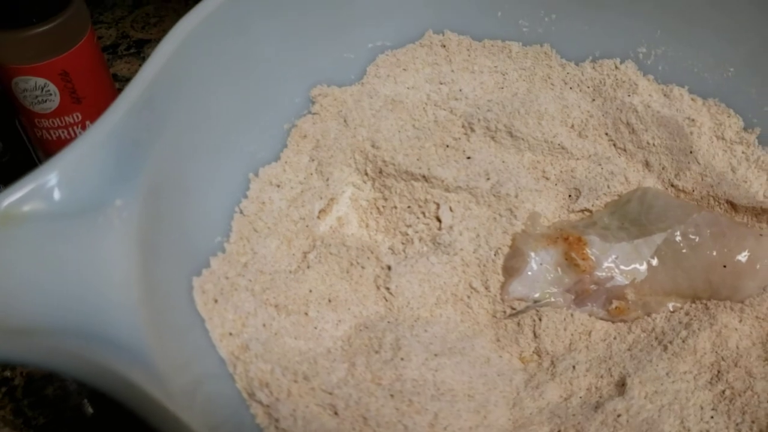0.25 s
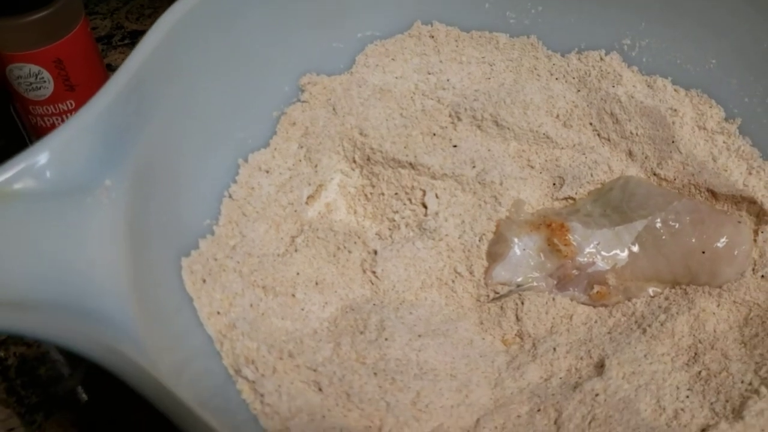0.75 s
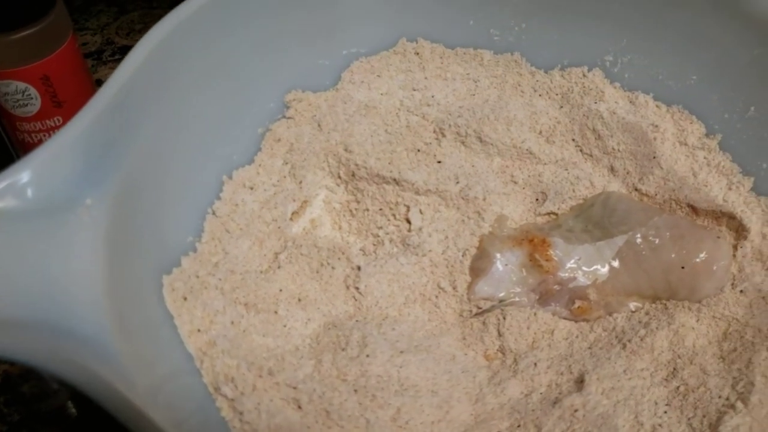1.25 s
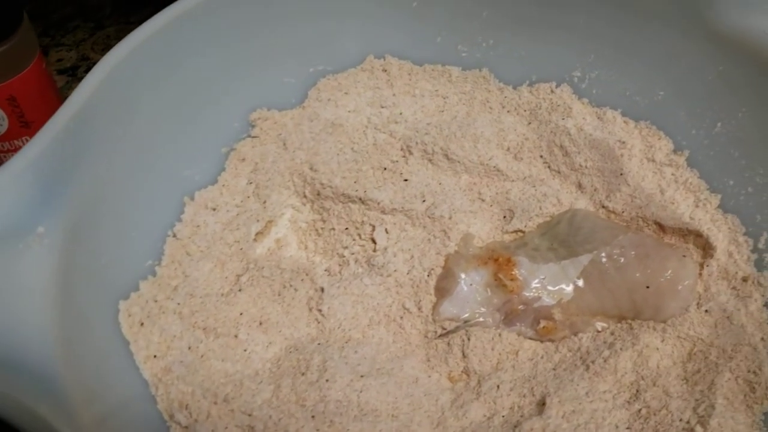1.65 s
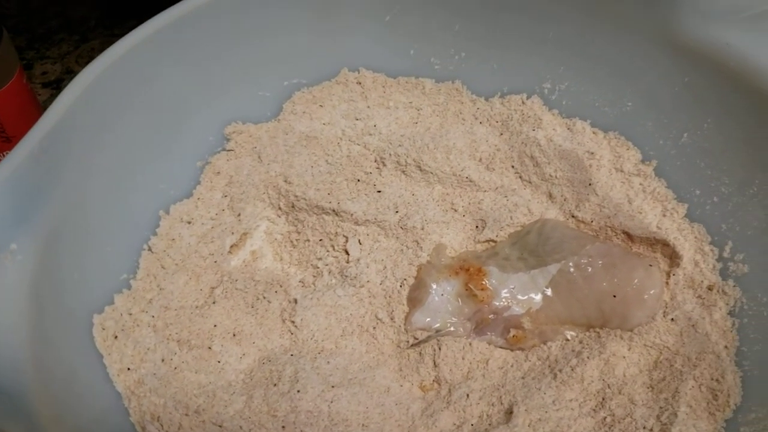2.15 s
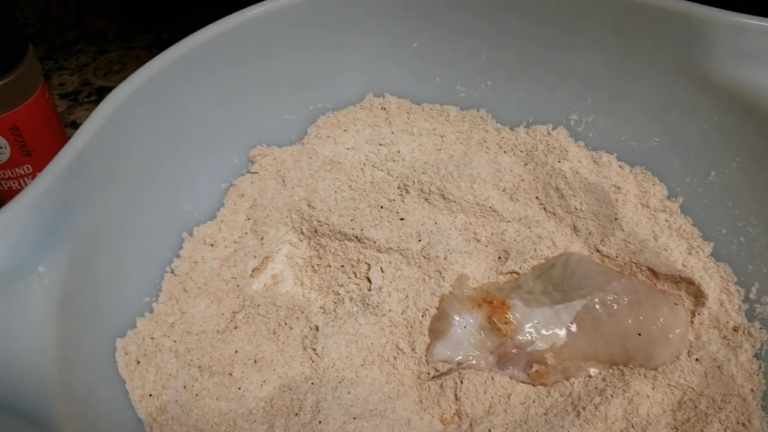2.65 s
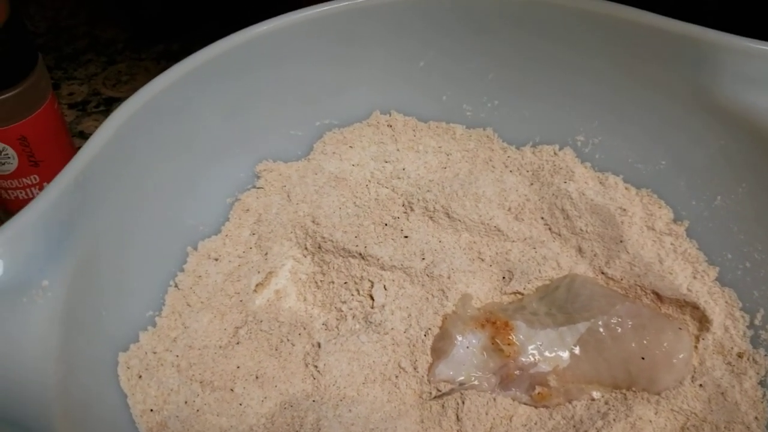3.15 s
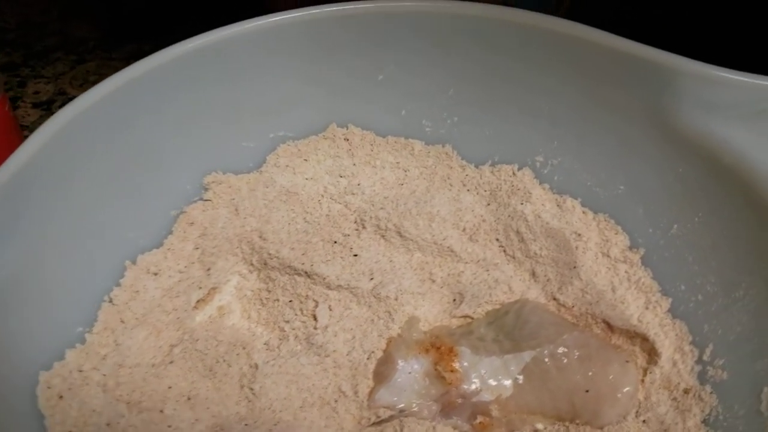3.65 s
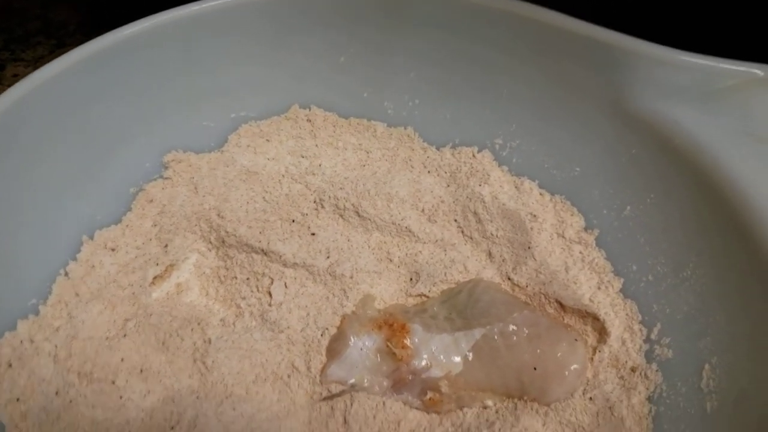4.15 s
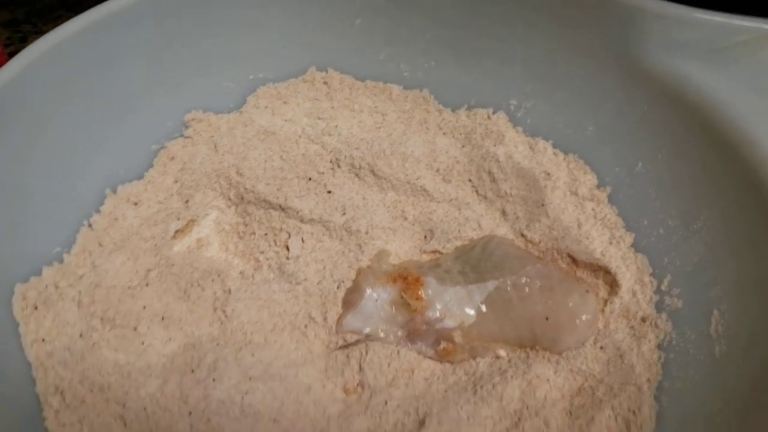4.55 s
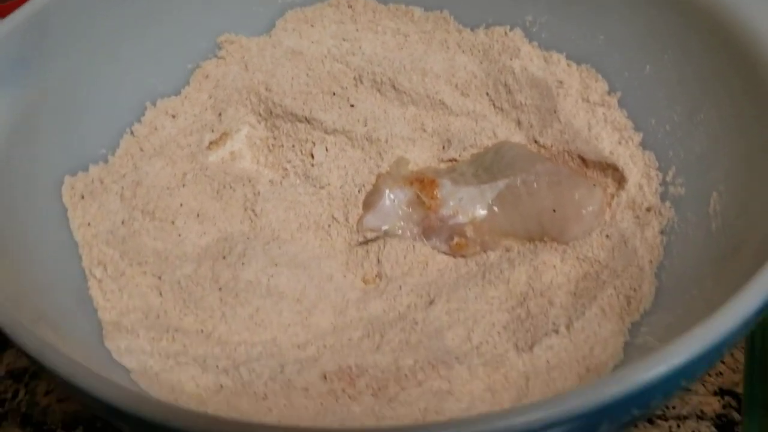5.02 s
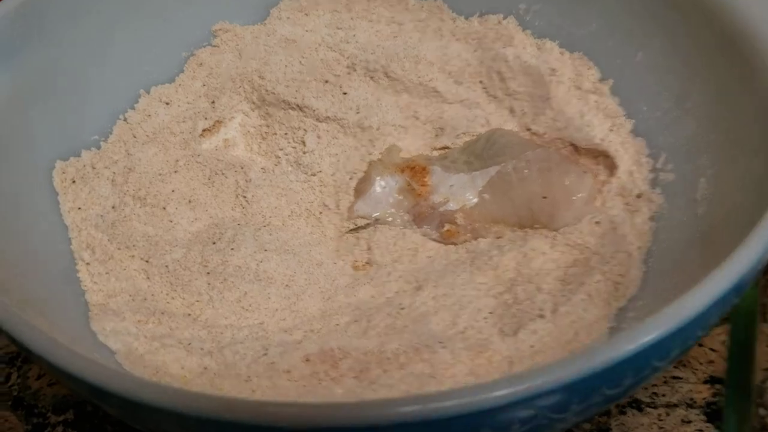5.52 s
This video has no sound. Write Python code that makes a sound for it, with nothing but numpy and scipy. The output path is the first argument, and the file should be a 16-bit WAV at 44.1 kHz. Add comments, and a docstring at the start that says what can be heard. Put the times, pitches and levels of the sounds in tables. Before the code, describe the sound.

A quiet home kitchen, heard close through a small stereo camera microphone. A low, steady refrigerator hum with soft rumble and faint hiss, stronger on the left, runs throughout, easing slightly after about 3 s. From 0.4 s metal tongs make a few tiny ticks. At 1.3 s and 1.6 s come clearer clacks against the bowl, then a scrape near 2 s and a bright, hard tap at 2.2 s. Between 2.8 and 3.5 s the contacts crowd together: ringing clacks, dry rattles, gritty sliding and low thumps as the bowl knocks the counter. From 3.6 to 4.3 s it is almost only the fridge. Faint taps resume, and from 4.7 to 5.15 s a second flurry arrives, with the loudest, sharpest click at 5.0 s, amid scraping. Brief scrapes trail off by 5.45 s; one light tick falls at 5.75 s. Rings are short, with small-room reflections.

```python
"""A refrigerator hums and hisses; then steel kitchen tongs click, tap and scrape at a bowl on a counter, close to
a two-port camera. Each contact is a short noise rattle plus one shared set of ringing modes, in four registers.
Scrapes are gritty noise, thumps are decaying counter modes, and a small kitchen answers with noise tails.
The refrigerator is sine lines over filtered noise. Above the bass, near sound reaches the right port first."""
import sys
import numpy as np
from scipy import signal
from scipy.fft import rfft, irfft, next_fast_len
from scipy.io import wavfile
from scipy.ndimage import uniform_filter1d, map_coordinates

SR = 44100
rng = np.random.default_rng(int(sys.argv[2]) if len(sys.argv) > 2 else 0)


def transcribe(u):
    """Save the signal u as a 16-bit wav file named by the first command-line argument.

    u: samples, shape (n,) or (channels, n), limited to [-1, 1]; the rate is SR.
    q: integer samples, one column per channel.
    """
    v = np.clip(np.atleast_2d(u).T, -1, 1)
    q = np.round(v * 32767).astype(np.int16)
    wavfile.write(sys.argv[1], SR, q)


N = 255118


def amp(db):
    """Decibels to gain."""
    return 10 ** (np.asarray(db) / 20)


def unit(x):
    """Scale to rms 1."""
    return x / np.sqrt(np.mean(x ** 2) + 1e-20)


def along(points, hz):
    """Interpolate (Hz, value) points on a log frequency axis."""
    f, v = np.transpose(points)
    return np.interp(np.log(hz + 1), np.log(f + 1), v)


def curve(rows):
    """One value per sample from (s, value) points."""
    return np.interp(np.arange(N) / SR, *np.transpose(rows))


def wobble(knots_hz):
    """Smooth random curve through normal knots."""
    knots = rng.standard_normal(int(N * knots_hz / SR) + 4)
    return map_coordinates(knots, [np.arange(N) * knots_hz / SR])


def filtered(x, response):
    """Apply a complex frequency response to x."""
    n = x.shape[-1]
    m = next_fast_len(n + 8192)
    return irfft(rfft(x, m) * response(np.fft.rfftfreq(m, 1 / SR)), m)[..., :n]


def patchy(depth_db):
    """Two noises sharing random gain patches in time and frequency."""
    z = signal.stft(rng.standard_normal((2, N)), nperseg=512)[2]
    field = rng.standard_normal(z.shape[1:])
    field = uniform_filter1d(field, size=8, axis=0)
    field = uniform_filter1d(field, size=12, axis=1)
    return signal.istft(z * amp(depth_db * unit(field)), nperseg=512)[1][:, :N]


# Diffuse sound at the two ports. Each row: frequency in Hz, left-right likeness (1 = identical).
PORT_LIKENESS = [(60, 0.98), (130, 0.87), (290, 0.63), (640, 0.65), (1400, 0)]


def paired(pair, spectrum):
    """Mix and colour two noises: bass alike at both ports, treble unrelated."""
    turn = lambda hz: np.arccos(np.clip(along(PORT_LIKENESS, hz), -1, 1)) / 2
    split = lambda hz: amp(along(spectrum, hz)) * [np.cos(turn(hz)), np.sin(turn(hz))]
    mid, side = filtered(pair, split)
    return np.array([mid + side, mid - side])


# Motor lines. Each row: frequency in Hz, level in dB rms before wobble and level changes.
HUM_LINES = [(59.2, -53.5), (96.9, -81.5), (150.7, -69.5), (199.2, -75.5), (236.9, -67.5), (312.2, -78),
             (414.5, -80)]
# Refrigerator level: hum and rumble rise slightly, then drop by 3.6 s. Each row: time in s, gain in dB.
FRIDGE_LEVEL = [(0, 2), (2.8, 3), (3.6, -0.5), (5.78, -0.5)]
# Rumble colour. Each row: frequency in Hz, relative spectral level in dB.
RUMBLE_COLOUR = [(20, -42), (35, -21.5), (52, -7), (75, -9.5), (100, -14), (122, -10.5), (170, -18),
                 (240, -15), (290, -22), (420, -21.5), (545, -32.5), (700, -43.5), (900, -56)]
# Hiss colour. Each row: frequency in Hz, relative spectral level in dB.
HISS_COLOUR = [(400, -40.5), (600, -3), (750, -5), (1000, 1.5), (1270, 5), (1700, 5), (2500, 5),
               (3000, -9.5), (3800, 0.5), (5000, -4.5), (6800, -9.5), (8000, -28.5), (10000, -29),
               (13000, -30.5), (16000, -38.5)]
# Hiss balance. Each row: frequency in Hz, left over right in dB.
HISS_LEFT_OVER_RIGHT = [(600, 4), (1000, 3), (1350, 10), (1700, 24.5), (3000, 19.5), (5000, 19),
                        (7500, 16.5), (10000, 1), (15000, 0)]
RUMBLE_RMS_DB, HISS_RMS_DB = -61.5, -66  # before level changes
HISS_FOLLOWS = .4  # dB of hiss per dB of refrigerator level


def fridge():
    """Slightly unsteady motor lines over rumble and a patchy hiss, stronger on the left."""
    t, level_db = np.arange(N) / SR, curve(FRIDGE_LEVEL)
    hum = 0
    for hz, rms_db in HUM_LINES:
        line_level = amp(rms_db + 3.0 + 0.4 * wobble(26))  # +3 dB: rms to peak
        hum = hum + line_level * np.sin(2 * np.pi * hz * t + .5 * wobble(5.3))
    rumble = unit(paired(patchy(depth_db=2.8), RUMBLE_COLOUR))
    lean = lambda hz: amp(along(HISS_LEFT_OVER_RIGHT, hz))
    shares = lambda hz: [lean(hz), hz ** 0] / np.sqrt(1 + lean(hz) ** 2)
    hiss = unit(filtered(patchy(depth_db=1.2), lambda hz: amp(along(HISS_COLOUR, hz)) * shares(hz)))
    low = amp(level_db) * (hum + amp(RUMBLE_RMS_DB) * rumble)
    return low + amp(HISS_RMS_DB + HISS_FOLLOWS * level_db) * hiss


# Faint top-octave hiss. Each row: time in s, level in dB rms.
FINE_HISS_LEVEL = [(0, -88), (1.0, -79), (3.6, -83.5), (5.78, -81)]


def fine_hiss():
    """Faint, slowly varying top-octave noise, unrelated at the two ports."""
    colour = [(8500, -29), (12500, 2), (15600, -2), (16100, -29)]  # Hz, dB
    noise = filtered(rng.standard_normal((2, N)), lambda hz: amp(along(colour, hz)))
    return amp(curve(FINE_HISS_LEVEL)) * unit(noise)


# Late decay of the room. Each row: frequency in Hz, t60 in s.
KITCHEN_T60 = [(200, 1), (1000, 0.4), (4000, 0.34), (12000, 0.11)]


def kitchen(x):
    """Bowl and counter scatter at once, walls and tiles answer longer; fresh noise tail each quarter second."""
    out, step = np.zeros((2, N + SR)), SR // 4
    delay = 30  # samples
    for start in range(0, N, step):
        hz, t, z = signal.stft(rng.standard_normal((2, SR // 2)), SR, nperseg=128)
        late = amp(-60 * t / along(KITCHEN_T60, hz)[:, None])
        early = 5 * amp(-60 * t / 0.032)
        tail = paired(signal.istft(z * (late + early), SR, nperseg=128)[1], [(20, 0)])
        tail = tail / np.linalg.norm(tail) * np.sqrt(2)
        wet = signal.fftconvolve(x[:, start:start + step], tail, axes=1)
        out[:, start + delay:][:, :wet.shape[1]] += wet
    return out[:, :N]


# Shading of near sound. Each row: frequency in Hz, left over right in dB.
NEAR_LEFT_OVER_RIGHT = [(60, 0.5), (99, 0.5), (160, 0.0), (270, -1.0), (450, 1.0), (740, 0.0), (1220, 3.0),
                        (2010, 8.0), (3330, 9.0), (5500, 7.5), (9080, -1.5), (15000, -3.5)]
LAG_S = 19 / 44100  # left behind right, above the bass


def ports(x):
    """The camera body shades near sound differently at each port and delays the left, except in the bass."""
    lag_rad = lambda hz: 2 * np.pi * hz * LAG_S / (1 + (900 / (hz + 1)) ** 4)
    half = lambda hz: amp(along(NEAR_LEFT_OVER_RIGHT, hz) / 2) * np.exp(-.5j * lag_rad(hz))
    size = lambda hz: np.sqrt(abs(half(hz)) ** 2 + abs(half(hz)) ** -2) / 2
    return filtered(x, lambda hz: np.array([half(hz), 1 / half(hz)]) / size(hz))


# Counter under the bowl. Each row: nominal frequency in Hz, relative level in dB, t60 in s.
COUNTER_MODES = [(104, 1, 0.1), (139, -5, 0.041), (282, -6, 0.066)]
# The bowl rocks on the counter. Each row: start in s, relative level in dB.
THUMP_TIMES = [(1.3, -41.5), (2.175, -49.5), (2.792, -31), (2.808, -38), (2.938, -39), (3.212, -43.5),
               (3.31, -45), (3.466, -42.5), (4.738, -41), (4.82, -48), (5.056, -37), (5.103, -49)]


def thumps():
    """The bowl knocks the counter: soft-onset damped modes, sent alike to both ports."""
    out, t = np.zeros(N + SR), np.arange(SR // 4) / SR
    onset = (1 - np.exp(-t / 0.0027)) ** 2
    for s, level_db in THUMP_TIMES:
        thud = 0
        for hz, db, t60_s in COUNTER_MODES:
            tone = np.sin(2 * np.pi * hz * t * rng.uniform(0.85, 1.07))
            thud = thud + amp(level_db + db - 60 * t / t60_s) * tone
        out[round(s * SR):][:len(t)] += thud * onset
    return out[:N]


# Rasp of steel on glaze. Each row: frequency in Hz, relative spectral level in dB.
RASP_COLOUR = [(1290, -39), (2200, -13.5), (2910, -6.5), (3160, -15), (3740, -0.5), (5030, 3.5),
               (8200, -9.5), (13700, -6), (16000, -16.5), (16500, -32)]
# The bowl's answer to rubbing. Each row: frequency in Hz, relative spectral level in dB.
RUB_COLOUR = [(290, -44.5), (500, -11), (888, -4), (1570, -4.5), (1820, -1), (2170, -8.5), (3200, -1),
              (4160, -25.5), (7040, -120)]
# Sliding tips. Each row: start in s, length in s, relative rasp level in dB, relative rub level in dB.
SLIDES = [(0, 0.049, -80, -63), (.89, .05, -90, -68.5), (1.622, .12, -64.5, -68), (1.881, .09, -67.5, -75),
          (1.989, 0.12, -51.5, -56.5), (2.2, .09, -61, -58), (2.835, .12, -55, -55),
          (2.962, .45, -52.5, -56.5), (3.437, .14, -60.5, -63), (4.316, .14, -77, -67),
          (4.609, .12, -66.5, -66), (4.757, .32, -50, -50), (5.091, .13, -51, -62),
          (5.238, 0.085, -47.5, -65), (5.337, .1, -72, -65)]
GRIP_S, LIFT_S = .01, .015  # time per 20 dB of rise, of fall


def scrapes():
    """The tips slide over the bowl: gritty noise that catches unevenly."""
    grit = rng.standard_normal(N) * amp(3.5 * wobble(500) + 2.5 * wobble(70))
    rasp = unit(filtered(grit, lambda hz: amp(along(RASP_COLOUR, hz))))
    rub = unit(filtered(grit, lambda hz: amp(along(RUB_COLOUR, hz))))
    t, out = np.arange(N) / SR, np.zeros(N)
    for s, length_s, rasp_db, rub_db in SLIDES:
        before, after = np.maximum(s - t, 0), np.maximum(t - s - length_s, 0)
        pressure = amp(-20 * (before / GRIP_S + after / LIFT_S))
        out += pressure * (amp(rasp_db) * rasp + amp(rub_db) * rub)
    return out


def resonance(f, centre_hz, width_hz):
    """Complex response of one resonance, 1 at its centre."""
    return 1j * f * width_hz / (centre_hz ** 2 - f * f + 1j * f * width_hz)


# Steel on the bowl. Each row: frequency in Hz, relative spectral level in dB.
RATTLE_COLOUR = [(180, -54.5), (300, -11.5), (496, -11), (587, -24.5), (705, -12.5), (1600, -8),
                 (1830, -7.5), (3190, -6), (3840, 3.5), (6340, -3), (8300, -12.5), (14900, -6.5),
                 (16500, -36)]
# Tongs and bowl ringing together. Each row: nominal frequency in Hz, level in dB over the rattle colour,
# t60 in s at the loosest grip.
RING_MODES = [(498.5, -2.5, 0.15), (694, -13, 0.15), (860, -7.5, 0.055), (1204, -5.5, 0.21),
              (1440, -10.5, 0.057), (1790, 6.5, 0.05), (2380, 1.5, 0.052), (2520, 0.5, 0.027),
              (2725, -4, 0.29), (3180, 12, 0.027), (3820, -8, .07), (3975, -5, .09), (4395, -6, .11),
              (4937, -28, .12), (6260, -5.5, .1), (6270, 2, 0.14), (7830, 11.5, 0.047), (9050, -19.5, 0.15),
              (10330, -8, 0.1), (12000, -6.5, 0.076), (16000, 8, 0.046)]
# Register centres in Hz: weight, clack, ring, sharpness.
REGISTERS_HZ = [700, 2000, 4500, 10000]
LOW_SPOT_HZ, HIGH_SPOT_HZ = 2210, 4100  # dull wall of the bowl to bright steel tips
CLACK_DB, RING_DB = (-1, -7), (-9.5, -4.5)  # re strength, at low and high spot
LIGHT_DB, THINS = -28.5, 0.35  # below this strength clack drops by THINS dB per dB
TURN_DB = 0.5  # left-right scatter per touch


def contact(strength_db, weight_db, sharp_db, ping_hz, knock_hz, t60_s, ping_db, t):
    """One touch at both ports: a crack, a rattle of tiny bounces and the ringing modes."""
    t60_s = np.clip(t60_s, .01, .3)

    noise = unit(filtered(rng.standard_normal(len(t)), lambda hz: amp(along(RATTLE_COLOUR, hz))))
    steps = np.repeat(rng.standard_normal(len(t) // 64 + 1), 64)[:len(t)]
    bounces = amp(2.5 * steps)  # the tips chatter
    dying = 4 * amp(-60 * t / 0.0051) + amp(-60 * t / t60_s) + 0.036 * amp(-60 * t / 0.3)
    onset = 1 - np.exp(-t / (0.0029 * t60_s))  # longer rattles start softer
    rattle = noise * bounces * dying * onset

    flutter = np.interp(t, t[::400], rng.standard_normal(len(t[::400])))  # loose arms make the ring waver
    free = (t60_s / 0.3) ** .6  # a firm grip damps both rattle and ring
    ring = 0
    for hz, db, life_s in RING_MODES:
        level_db = db + along(RATTLE_COLOUR, hz) + rng.normal(0, 3.4)
        tone = np.sin(2 * np.pi * (hz * rng.normal(1, 0.004) * t + rng.random()))
        ring = ring + amp(level_db - 60 * t / (life_s * free)) * tone
    ring = ring * onset * amp(1.3 * flutter)

    # the struck spot favours two notes in the rattle, the knock alone in the ring
    knock = lambda f, width_hz: 1 + 2.4 * resonance(f, knock_hz, width_hz)
    spot = lambda f: knock(f, 80) + amp(ping_db) * resonance(f, ping_hz, 210)
    sound = filtered(rattle, spot) + 0.36 * filtered(ring, lambda f: knock(f, 120))

    # where the tongs strike sets the share of each register
    clack_db = np.interp(ping_hz, [LOW_SPOT_HZ, HIGH_SPOT_HZ], CLACK_DB)
    clack_db = clack_db - THINS * max(LIGHT_DB - strength_db, 0)
    ring_db = np.interp(ping_hz, [LOW_SPOT_HZ, HIGH_SPOT_HZ], RING_DB)
    register_db = strength_db + np.array([weight_db, clack_db, ring_db, sharp_db])
    left_db = TURN_DB * rng.standard_normal()
    out = np.zeros((2, len(t)))
    aimed = [0, 1, 1, 1]  # lowest register has no scatter
    for own, db, aim in zip(np.eye(len(REGISTERS_HZ)), register_db, aimed):
        share = np.transpose([REGISTERS_HZ, own])
        part = filtered(sound, lambda hz: along(share, hz) ** 0.58)
        out += amp(db + aim * left_db * np.array([[.5], [-.5]])) * part / np.abs(part).max()
    return out


# Touches. Each row: start in s, strength in dB, weight in dB re strength, sharpness in dB re strength,
# pitch of the struck spot in Hz, knock in Hz, rattle t60 in s, emphasis of the pitch in dB.
TOUCHES = [(0.4179, -36, -41, -14, 4800, 423, 0.02, 32), (0.6514, -43, -40, -15, 4620, 1430, 0.047, 18),
           (0.7153, -42, -35, -18, 3860, 423, 0.084, 2), (1.1613, -38, -37.5, -3.5, 4410, 428, 0.02, 19),
           (1.2994, -18.5, -11, -7, 4100, 423, 0.022, -2.5),
           (1.3044, -18.5, -15, -3, 4430, 880, 0.071, -11), (1.4311, -29, -24, -5, 3970, 921, 0.036, 11),
           (1.5549, -39.5, -32, -27, 4250, 455, 0.18, 3), (1.6197, -15, -43.5, -12, 3190, 1450, 0.047, -1),
           (1.6394, -26.5, -13, -2, 2290, 1150, 0.065, 16), (1.6601, -27, -10, -11, 1860, 891, 0.041, 8),
           (1.8397, -44, -23, -19, 4390, 423, 0.16, 3), (1.9834, -32.5, -32, -6, 3910, 493, 0.02, 22),
           (2.0243, -31.5, -17, -23, 4460, 1060, 0.18, -9), (2.1071, -28, -57, -5, 3820, 1450, 0.091, -7),
           (2.176, -8.5, -29, -13.5, 3940, 1410, 0.08, 6.5),
           (2.2273, -26.5, -43, -11.5, 2540, 1250, 0.13, 16.5),
           (2.3501, -20, -52.5, -10, 4160, 1410, 0.03, 10),
           (2.5716, -36.5, -31.5, -10.5, 3850, 423, 0.022, 11.5),
           (2.6494, -40.5, -26.5, -15, 4260, 423, 0.039, 10),
           (2.7906, -12, -18, -14.5, 2050, 479, 0.051, 22),
           (2.8104, -22.5, -14.5, -2.5, 2040, 700, 0.068, 2),
           (2.9093, -30.5, -9.5, 1.5, 4380, 1410, 0.032, 11.5),
           (2.9397, -14.5, -9, -3.5, 3970, 705, 0.064, 14.5),
           (2.9701, -8.5, -23, -13.5, 1810, 1400, 0.068, 11.5),
           (3.0899, -19, -11.5, -9.5, 1800, 883, 0.17, 3.5), (3.2146, -28, -7.5, -9, 4240, 433, 0.027, 8.5),
           (3.247, -17.5, -30, 3, 1840, 1300, 0.15, 9.5),
           (3.2645, -10.5, -18.5, -4.5, 1810, 484, 0.085, 10), (3.3124, -9, -22, -5, 3840, 1250, 0.05, 0),
           (3.4504, -24.5, -33.5, -1.5, 3780, 1200, 0.17, 7),
           (3.467, -17.5, -22.5, 1.5, 4550, 1250, 0.09, -4),
           (3.4955, -22, -20.5, -14.5, 2730, 1250, 0.11, 4),
           (3.5628, -35.5, -22, -10, 2900, 1320, 0.17, 6.5),
           (4.3281, -44.5, -4, -11.5, 3950, 1270, 0.074, 6.5),
           (4.3789, -41, -9.5, -20, 2620, 1270, 0.05, 11.5), (4.5775, -41, -15, -30, 3770, 1240, 0.05, 0.5),
           (4.6344, -38.5, -18, -6, 3870, 1250, 0.18, 8), (4.6568, -26, -13, -2.5, 2410, 826, 0.093, 3.5),
           (4.7247, -30, -9, 3, 4150, 821, 0.047, 6), (4.7381, -15, -11, -1, 2240, 1210, 0.061, 6),
           (4.7611, -8.5, -26.5, -14, 2920, 1200, 0.032, 10), (4.8199, -15.5, -12, -3, 2750, 996, 0.11, 0),
           (4.8898, -24.5, -10.5, 8, 4990, 689, 0.031, 3.5), (4.9257, -7, -23, -14.5, 2270, 1340, 0.02, 7),
           (4.9791, -28, -26, -8, 2230, 1410, 0.02, 8), (5.003, -3, -35, -10.5, 4940, 697, 0.042, -2.5),
           (5.0569, -14, -15.5, 4, 4410, 495, 0.04, 3), (5.0754, -22, -12, -0.5, 4370, 1050, 0.079, 2),
           (5.1034, -25, -16.5, -2, 3870, 700, 0.046, 3), (5.1362, -29, -15.5, 3.5, 3890, 719, 0.06, 5),
           (5.7538, -34.5, -12.5, -16, 4880, 1350, 0.06, 14.5)]


def tongs():
    """Steel tips strike the bowl: every contact at its time, a quarter second each."""
    out, t = np.zeros((2, N + SR)), np.arange(SR // 4) / SR
    for s, *touch in TOUCHES:
        out[:, round(s * SR):][:, :len(t)] += contact(*touch, t)
    return out[:, :N]


def scene():
    """Tongs near the camera, their echo, the refrigerator and the fine hiss."""
    near = tongs() + thumps() + scrapes()
    return ports(amp(-5.0) * near + amp(-2.0) * kitchen(near)) + fridge() + fine_hiss()


def record(dry):
    """The camera keeps nothing above its band limit."""
    top_hz = 16600
    return filtered(dry, lambda hz: hz < top_hz)


dry = scene()
out = record(dry)
transcribe(out)
```